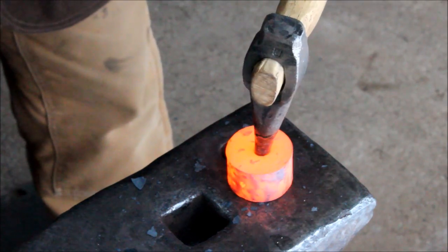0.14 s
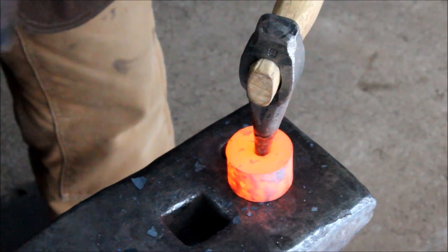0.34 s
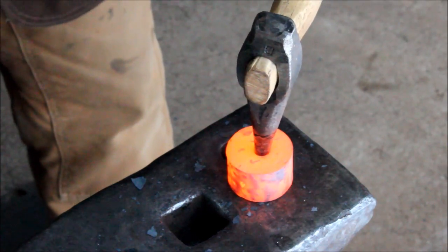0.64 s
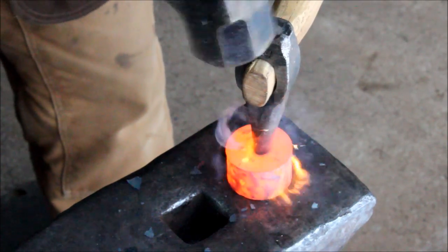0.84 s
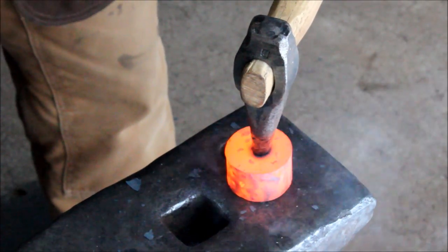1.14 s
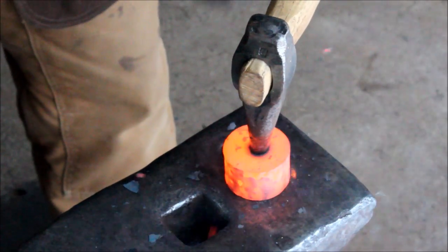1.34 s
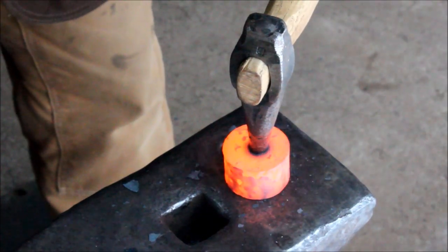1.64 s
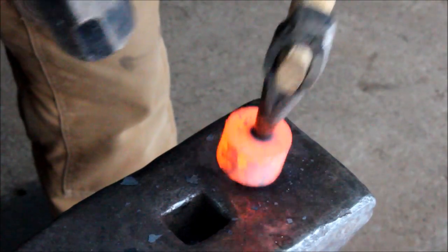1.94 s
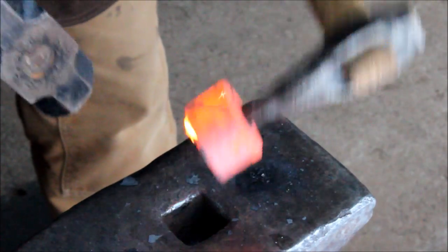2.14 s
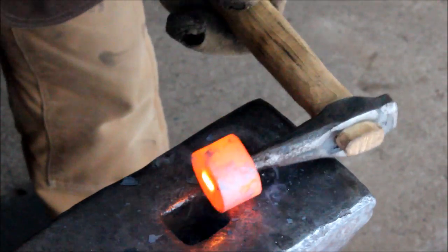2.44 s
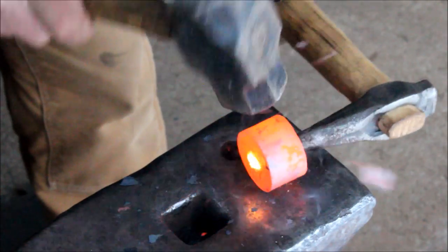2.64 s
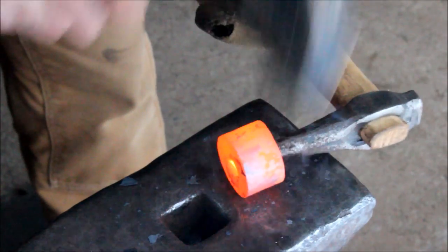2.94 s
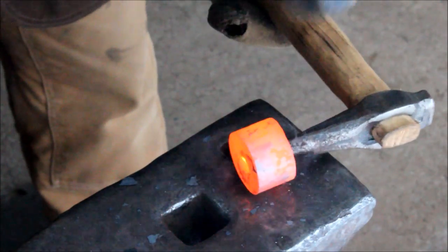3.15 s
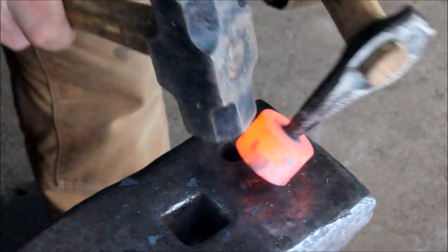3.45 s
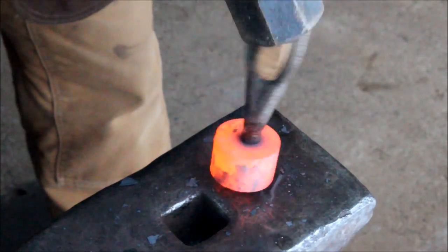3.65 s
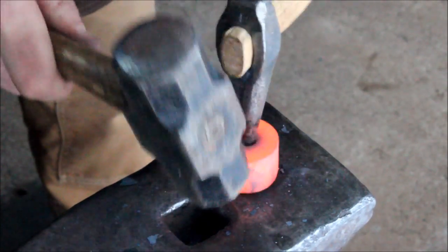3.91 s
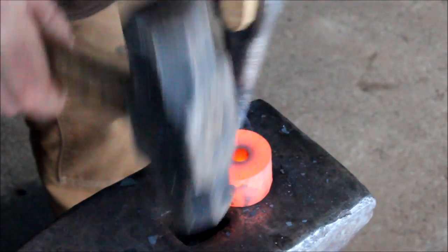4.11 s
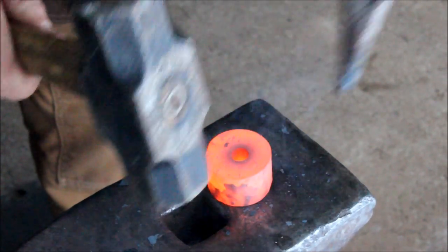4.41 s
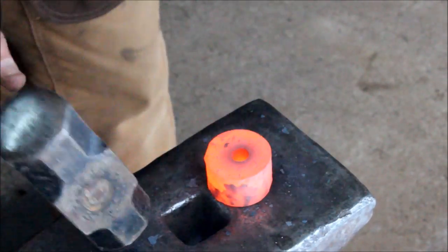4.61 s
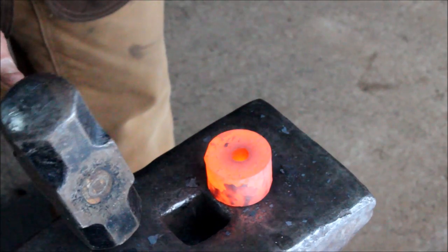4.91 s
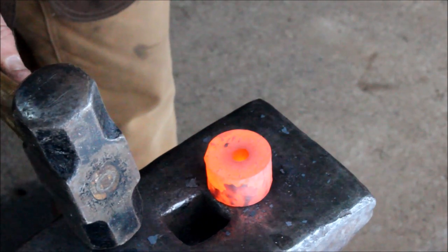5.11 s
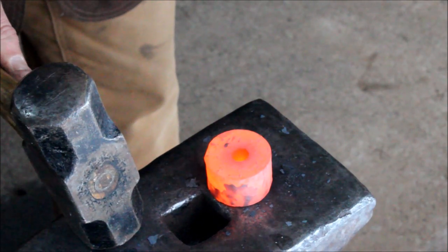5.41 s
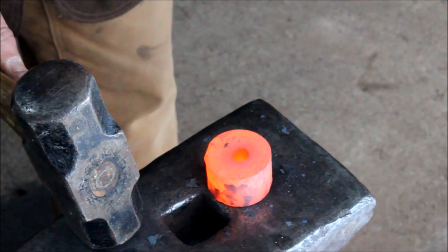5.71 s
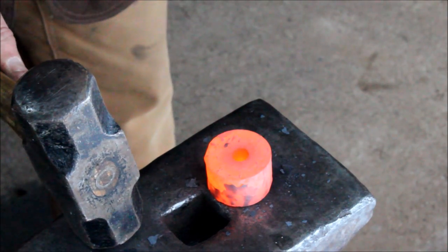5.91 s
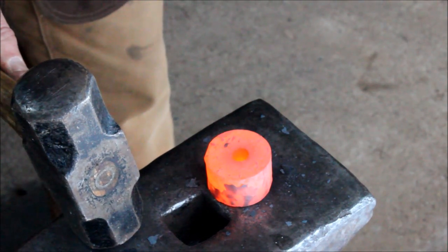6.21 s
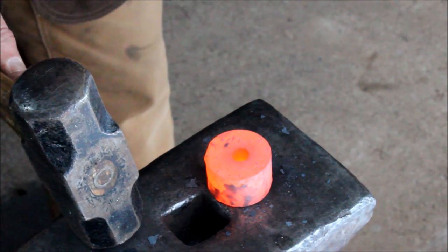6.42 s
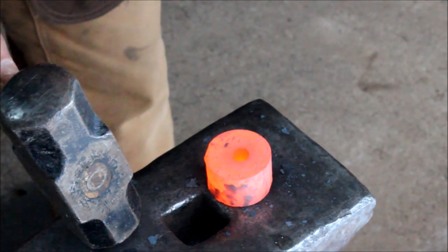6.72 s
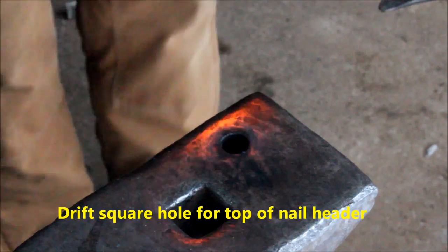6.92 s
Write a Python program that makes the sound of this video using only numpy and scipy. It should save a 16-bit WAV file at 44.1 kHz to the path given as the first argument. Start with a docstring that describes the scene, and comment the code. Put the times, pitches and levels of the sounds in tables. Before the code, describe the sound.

Eight sledge blows ring on a punch through hot steel, then the sledge bounces down and water briefly gurgles, hisses and clunks in a small workshop.

```python
"""Punching hot steel on an anvil

A smith drives a handled punch through hot steel: eight blows, each noise bursts plus decaying modes of the tools.
The sledge is let down on the anvil and bounces; the hot punch then gurgles and sizzles in water, as coloured grains
and whistling noise bands, and is dropped with a clunk, a damped burst. Tools scrape at the end, as rough grains.
Filtered noise gives the small workshop's reverberation and low rush; the close microphone overloads and clips."""
import sys
import numpy as np
from scipy import signal
from scipy.fft import rfft, irfft, next_fast_len
from scipy.io import wavfile
from scipy.ndimage import uniform_filter1d

SR = 44100
rng = np.random.default_rng(int(sys.argv[2]) if len(sys.argv) > 2 else 0)


def dump(signal):
    """Clip the signal to [-1, 1] and save it as 16-bit WAV at the path in sys.argv[1]."""
    limited = np.clip(np.atleast_2d(signal).T, -1, 1)
    pcm = np.round(limited * 32767).astype(np.int16)
    wavfile.write(sys.argv[1], SR, pcm)


N = 311343
T = np.arange(N) / SR
AGE = T[:SR]  # time since a contact [s]
# Levels in all tables are relative; spectra are shapes, and fades are exponential time constants.

# the sledge settles back on the punch: start and end (after the blow), loss
SETTLE_FROM_S, SETTLE_UNTIL_S, SETTLE_DB = .025, .04, -11
# share of the old ring that outlasts a new blow, and the time the choke takes
CHOKE_SHARE, CHOKE_S = .3, .01
# the stand's thud under a full blow
THUD_DB = -31
# weaker blows lose the top of their tick and of the anvil's ring, in dB per dB
SOFT_BLOW_DB, SOFT_DULLING = -5, 4.0
# dB that the sledge's high modes change per dB of a blow's treble
SLEDGE_DULLING = .7
# spectrum of a blow's crack: (frequency [Hz], density [dB per Hz])
CRACK_SPECTRUM = [(40, -23.5), (100, -8), (230, -0.5), (450, 2.5), (800, 0), (1060, 0.5), (2000, -1.5),
                  (2800, 2), (4000, -0.5), (5200, 1.5), (6700, -2), (7500, -7.5), (11000, -15.5),
                  (16000, -26)]
# sledge blows: (time [s], crack [dB], bass [dB], body [dB], treble [dB], fade [s], punch ring [dB],
# lowest punch modes [dB], sledge ring [dB], anvil ring [dB], nearness to the anvil's edge [0-1])
SLEDGE_BLOWS = [(0.8453, 10.5, -1, -2.5, 0, .0036, -16, 3, -18.5, -17, .7),
                (1.2874, 5.5, -2.5, -2, 1, .0027, -2.5, -1.5, -24.5, -23, .05),
                (1.7553, 5.5, -6.5, -4, .5, .0032, -5.5, -8, -20.5, -32, .1),
                (2.2764, -10, -7, -1.5, -3, .0034, -6.5, -7.5, -35.5, -47, .15),
                (2.655, .5, 1.5, 1.5, -2.5, .0024, -7.5, 5, -33, -45, .35),
                (3.032, -1.5, 2.5, 1.5, -4, .0026, -9.5, .5, -24, -43, .65),
                (3.3665, -4.5, -1, 0, -8.5, .0035, -13.5, -1, -30.5, -49, .7),
                (4.212, -2.5, 1, 9, -17, .0025, -10, 2.5, -22.5, -40.5, .78)]


def blows():
    """Impact excitation: each blow ticks, cracks and rings punch, sledge, anvil and stand; gives cracks and rings."""
    cracks, rings = np.zeros(N), np.zeros(N)
    # the punch rings freely for a moment, then the sledge settles back on it
    settle = undb(np.interp(AGE, [SETTLE_FROM_S, SETTLE_UNTIL_S], [0, SETTLE_DB]))
    for (s, crack_db, bass_db, body_db, treble_db, fade_s, punch_db,
         lowest_db, sledge_db, anvil_db, edge) in SLEDGE_BLOWS:
        # the pressure of a new blow chokes what still rings
        rings *= np.interp(T, [s, s + CHOKE_S], [1, CHOKE_SHARE])
        add(cracks, s, undb(crack_db) * burst(CRACK_SPECTRUM, bass_db, treble_db, fade_s, body_db))
        top_db = SOFT_DULLING * min(crack_db - SOFT_BLOW_DB, 0)
        add(cracks, s, first_tick(crack_db, treble_db, top_db))

        thud_db = THUD_DB + min(crack_db + bass_db, 0)
        add(rings, s, undb(thud_db) * stand(scatter_db=0))
        punch_ring = settle * flutter(rate=100, depth_db=4) * punch(lowest_db)
        add(rings, s, undb(punch_db) * punch_ring)
        # a soft blow spares the sledge's high modes
        high_db = SLEDGE_DULLING * treble_db
        sledge_ring = sledge(lambda hz: high_db * (hz > 6000), scatter_db=1)
        add(rings, s, undb(sledge_db) * flutter(rate=46, depth_db=2.0) * sledge_ring)
        add(rings, s, undb(anvil_db) * flutter(rate=14, depth_db=2.5) * anvil(edge, top_db))
    return cracks, rings


# level for a 0 dB blow [dB], dB per dB of crack and of treble, fade
TICK_DB, TICK_PER_CRACK, TICK_PER_TREBLE, TICK_FADE_S = 2.5, 1.3, .7, .00038
# spectrum of the first tick of steel on steel: (frequency [Hz], density [dB per Hz])
TICK_SPECTRUM = [(300, -14.5), (1500, -4), (4000, -1), (8000, 2), (12000, -6), (16000, -5)]


def first_tick(crack_db, treble_db, top_db):
    """Contact stiffness: the harder and brighter the blow, the stronger its first tick."""
    level_db = TICK_DB + TICK_PER_CRACK * crack_db + TICK_PER_TREBLE * treble_db
    return undb(level_db) * burst(TICK_SPECTRUM, 0, top_db, TICK_FADE_S)


# modes of the punch: (frequency [Hz], level [dB], t60 [s])
PUNCH_MODES = [(1809, -9.5, .3), (1831, -21, .2), (2401, -7.5, .22), (2458, -1, .36), (2475, -11, .42),
               (6110, -18, .26), (6713, -25, .3), (6870, -26, .25), (9889, -30, .16), (11530, -38, .4),
               (11990, -37, .3)]


def punch(lowest_db):
    """Bending vibration: an off-centre blow feeds the punch's lowest modes more."""
    modes = [(hz, db + lowest_db * (hz < 2000), t60) for hz, db, t60 in PUNCH_MODES]
    return ring(modes, scatter_db=0)


# modes of the sledge: (frequency [Hz], level [dB], t60 [s])
SLEDGE_MODES = [(2485, -5, .3), (3904, 1.5, .25), (3916, -11, .3), (4657, -7, .24), (5110, -12, .3),
                (5561, -11, .32), (6102, -1.5, .3), (7770, -18, .2), (7880, -20, .35), (8245, -8.5, .34)]


def sledge(tilt_db, scatter_db):
    """Modal excitation: the contact tilts the balance of the sledge's modes."""
    return ring([(hz, db + tilt_db(hz), t60) for hz, db, t60 in SLEDGE_MODES], scatter_db)


# modes of the anvil: (frequency [Hz], level struck mid-face [dB], level struck at the edge [dB], t60 [s])
ANVIL_MODES = [(3597, -11, 4.5, .48), (4569, 0, -4, .78), (5880, -20, -11, .6), (10340, -26, -30, .45),
               (11150, -16, -19, .8), (11161, -23, -25, .8)]


def anvil(edge, top_db):
    """Mode shapes: the struck spot decides which modes take the energy; a soft contact spares the top ones."""
    share = np.clip(edge, 0, 1)
    modes = []
    for hz, mid_db, rim_db, t60 in ANVIL_MODES:
        db = mid_db + share * (rim_db - mid_db) + top_db * (hz > 9000)
        modes.append((hz, db, t60))
    return ring(modes, scatter_db=1.5)


# modes of the anvil's stand and the floor under it: (frequency [Hz], level [dB], t60 [s])
STAND_MODES = [(48, -21, .9), (97, -28, .55), (110, -8, .16), (228, 0, .2), (270, -3, .13), (310, -6, .12),
               (450, -4, .1)]


def stand(scatter_db):
    """Low-frequency resonance: stand and floor thud under a contact."""
    return ring(STAND_MODES, scatter_db)


# thin high notes and a short clink, started by blows and taps: (time [s], frequency [Hz], level [dB], t60 [s])
THIN_NOTES = [(.8454, 6500, -45.5, 1.3), (1.7553, 6490, -49, 2.2), (1.7553, 8740, -57, 2.4),
              (3.885, 6500, -57.5, 1), (4.15, 1330, -31, .17), (4.15, 2200, -34, .15)]


def thin_notes():
    """Modal decay: single thin modes ring on after a contact."""
    out = np.zeros(N)
    for s, hz, db, t60 in THIN_NOTES:
        add(out, s, flutter(rate=20, depth_db=1.5) * ring([(hz, db, t60)], scatter_db=1))
    return out


# spectrum of a light contact: (frequency [Hz], density [dB per Hz])
TAP_SPECTRUM = [(60, -17), (230, -3.5), (600, 2), (900, 0), (1280, 4.5), (1900, -1), (3400, -4.5),
                (4700, -14), (6000, -19), (7500, -30.5), (11000, -46), (16000, -54)]
# light contacts of tools on the work and the anvil: (time [s], level [dB], bass [dB], treble [dB], fade [s],
# thud [dB], sledge ring [dB], anvil ring [dB])
LIGHT_CONTACTS = [(3.853, -35, 3, 8, .006, -45, -63, -72), (3.885, -14.5, -.5, 12, .0025, -23, -50, -63),
                  (4.1185, -42, 13.5, 10, 0.0044, -54, -75, -81),
                  (4.149, -16.5, -14, 18, .004, -59, -47, -68),
                  (4.663, -9.5, -6, -6, 0.0029, -34, -34, -40),
                  (4.7815, -11, -5, -20, 0.0042, -34, -34, -48),
                  (4.8354, -12, -4, -11, .0022, -35, -40, -40.5),
                  (4.8684, -14, -7, -17, 0.0023, -35, -40, -53)]


def taps():
    """Slow contact: the punch is set on the work, later the sledge bounces to rest; low modes are favoured."""
    cracks, rings = np.zeros(N), np.zeros(N)
    for s, db, bass_db, treble_db, fade_s, thud_db, sledge_db, anvil_db in LIGHT_CONTACTS:
        add(cracks, s, undb(db) * burst(TAP_SPECTRUM, bass_db, treble_db, fade_s))
        add(rings, s, undb(thud_db) * stand(scatter_db=1.5))
        sledge_ring = sledge(lambda hz: at(hz, [(2500, 9.5), (3900, -2.5), (9000, -12)]), scatter_db=0.5)
        add(rings, s, undb(sledge_db) * sledge_ring)
        # the anvil is struck at its edge
        add(rings, s, undb(anvil_db) * anvil(edge=1, top_db=-5))
    return cracks, rings


# ticks of flaking scale and spitting water: (time [s], level [dB])
SCALE_TICKS = [(.088, -35), (.188, -30.5), (.435, -37), (0.926, -33), (5.75, -23), (6.152, -38),
               (6.861, -48), (7.028, -44)]


def ticks():
    """Impulsive radiation: tiny bright snaps."""
    spectrum = [(500, -19), (3000, 2.5), (10000, -3.5), (16000, -4)]  # (Hz, dB per Hz)
    out = np.zeros(N)
    for s, db in SCALE_TICKS:
        add(out, s, undb(db) * burst(spectrum, 0, 0, fade_s=0.00067))
    return out


SURGE_RISE_S = .02
# the steam pocket forms, grows (time constant) and sinks in pitch towards a settled note
POCKET_FORMS_S, POCKET_FIRST_HZ, POCKET_SETTLED_HZ, POCKET_GROW_S = 5.125, 1900, 1220, .07
# spectra of boiling and of sizzling: (frequency [Hz], density [dB per Hz])
GURGLE_SPECTRUM = [(47, -56), (80, -23), (166, -12), (316, -23), (404, -5), (820, -1), (1340, -3),
                   (1900, -6.5), (3100, -9.5), (3790, -10.5), (8600, -21.5), (14000, -72), (16000, -73)]
SIZZLE_SPECTRUM = [(120, -42), (200, -9.5), (387, -10), (440, -4), (569, -14), (1210, -5), (1480, -4.5),
                   (2860, -3.5), (3190, -4), (9060, -7), (12800, -16.5), (14900, -28), (16000, -44)]
# surges of the quench: (time [s], hold [s], fade [s], boiling [dB], steam pocket [dB], sizzle [dB])
QUENCH_SURGES = [(5.14, .02, .1, -62, -41, -44), (5.255, .02, .2, -33.5, -39.5, -55),
                 (5.44, .08, .05, -47, -44, -56), (5.575, .005, .11, -48, -39, -31),
                 (5.7, .06, .17, -60, -66, -38.5), (6.14, .17, .03, -66, -66, -44)]
# narrow jets of steam: (start [s], end [s], start frequency [Hz], end frequency [Hz], level [dB])
STEAM_JETS = [(5.105, 5.42, 7400, 7450, -54.5), (5.308, 5.578, 3150, 3050, -46.5),
              (5.533, 5.636, 4700, 4400, -37.5), (5.534, 5.616, 5900, 5800, -42),
              (5.601, 5.838, 2600, 3150, -44)]


def quench():
    """Boiling and cavity resonance: hot steel gurgles and sizzles, a growing steam pocket sinks, jets whistle."""
    boil_gain = pocket_gain = sizzle_gain = 0
    for s, hold_s, fade_s, boil_db, pocket_db, sizzle_db in QUENCH_SURGES:
        surge = swell(s, SURGE_RISE_S, hold_s, fade_s)
        boil_gain = boil_gain + undb(boil_db) * surge
        pocket_gain = pocket_gain + undb(pocket_db) * surge
        sizzle_gain = sizzle_gain + undb(sizzle_db) * surge

    bubbles = unit(colour(grains(rate=2700, spread_db=0.5), GURGLE_SPECTRUM))
    boil = bubbles * undb(0.97 * walk(45)) * boil_gain

    young = np.exp(-np.maximum(T - POCKET_FORMS_S, 0) / POCKET_GROW_S)
    pocket_hz = POCKET_SETTLED_HZ + young * (POCKET_FIRST_HZ - POCKET_SETTLED_HZ)
    steam = whistle(pocket_hz) * pocket_gain
    for start, end, start_hz, end_hz, db in STEAM_JETS:
        progress = np.clip((T - start) / (end - start), 0, 1)
        jet_hz = start_hz + progress * (end_hz - start_hz)
        steam += undb(db) * np.sin(np.pi * progress) * whistle(jet_hz)

    spatter = unit(colour(grains(rate=9000, spread_db=0.5), SIZZLE_SPECTRUM))
    sizzle = spatter * undb(0.73 * walk(60)) * sizzle_gain
    return boil + steam + sizzle


# spectrum of knocks and splashes: (frequency [Hz], density [dB per Hz])
CLUNK_SPECTRUM = [(35, -72), (60, -56), (153, -3), (198, -16.5), (448, 7), (527, 3.5), (666, 4), (803, 3),
                  (1410, -1), (8510, -15.5), (12100, -26.5), (14900, -58), (16000, -74)]
# dull knocks and splashes further off: (time [s], level [dB], bass [dB], treble [dB], fade [s])
FAR_CLUNKS = [(5.252, -27, 1.5, -4, 0.045), (5.345, -23.5, -3.5, 1.5, 0.016), (5.976, -26.5, -1.5, 5, .012),
              (6.005, -23, -10, 6, 0.045), (6.024, -3, -7, 0, .013), (6.229, -21.5, -6.5, -1, 0.0042),
              (6.8988, -31, 8, 8, 0.0096), (6.9862, -34.5, 7, 1, 0.0056)]


def clunks():
    """Damped impact: slops of water and knocks of tools put down fade without ringing."""
    out = np.zeros(N)
    for s, db, bass_db, treble_db, fade_s in FAR_CLUNKS:
        add(out, s, undb(db) * burst(CLUNK_SPECTRUM, bass_db, treble_db, fade_s))
    return out


TWIST_RISE_S, TWIST_FADE_S = .11, .03
DRAG_RISE_S, DRAG_FADE_S = .004, .012
# spectra of the twisting punch and of the dragged tool: (frequency [Hz], density [dB per Hz])
TWIST_SPECTRUM = [(400, -24), (1500, -5.5), (1900, 3), (2200, -5.5), (2500, 2), (3000, -4), (6000, -8),
                  (10000, -11), (16000, -28.5)]
DRAG_SPECTRUM = [(47, -44), (80, -13), (222, -4.5), (395, -9.5), (441, -8), (802, -15), (1670, -10.5),
                 (3540, -10.5), (9190, -21.5), (13700, -35), (16000, -54)]
# twists of the punch in the hot work: (time of full pressure [s], hold [s], level [dB])
PUNCH_TWISTS = [(.02, .3, -57), (.6, .23, -51.5), (2.2, .07, -52.5), (2.59, .06, -58), (3.0, .03, -60),
                (4.52, .13, -63)]
# pushes of a tool dragged over grit: (time of full pressure [s], hold [s], level [dB])
GRIT_DRAGS = [(6.858, .03, -43), (6.902, .16, -37), (6.952, .015, -33), (7.027, .012, -38)]


def scrape():
    """Stick-slip friction: steel catches and slips as the punch twists in its hole, later as a tool drags on grit."""
    twist_gain = sum(undb(db) * swell(s, TWIST_RISE_S, hold_s, TWIST_FADE_S) for s, hold_s, db in PUNCH_TWISTS)
    drag_gain = sum(undb(db) * swell(s, DRAG_RISE_S, hold_s, DRAG_FADE_S) for s, hold_s, db in GRIT_DRAGS)
    twist = unit(colour(grains(rate=6000, spread_db=3.0), TWIST_SPECTRUM))
    drag = unit(colour(grains(rate=5700, spread_db=0.5), DRAG_SPECTRUM))
    return twist * undb(1.7 * walk(30)) * twist_gain + drag * undb(1.5 * walk(70)) * drag_gain


# quick reflections and tail, before the room's colour
EARLY_DB, LATE_DB = -6.5, -16.7
# the workshop's decay: (frequency [Hz], t60 [s])
ROOM_DECAY = [(100, 0.62), (300, 0.51), (1000, 0.6047), (3000, .5), (6000, 0.506), (14000, 0.31)]
# the workshop's tone: (frequency [Hz], gain [dB])
ROOM_TONE = [(40, -5.5), (110, 0.5), (230, 4), (600, -1.5), (2500, -3), (6000, -4.5), (10000, -9),
             (12500, -11), (16000, -20)]


def room(x, early_db, late_db):
    """Reverberation: quick reflections from anvil, floor and smith, then a tail that dulls as it fades."""
    hz, s, bins = signal.stft(rng.standard_normal(len(AGE)), SR, nperseg=256)
    fading = bins * np.exp(-np.log(1000) * s / at(hz, ROOM_DECAY)[:, None])
    late = signal.istft(fading, SR)[1][:len(AGE)] * np.clip(AGE / 0.017, 0, 1)
    early = rng.standard_normal(len(AGE)) * np.exp(-AGE / .02) * np.clip(AGE / 0.0054, 0, 1)
    early = even(early, 30)
    response = undb(early_db) * unit(early) + undb(late_db) * unit(late)
    # the end of the response is faded to silence
    fade_out = np.clip((AGE[-1] - AGE) * 10 - 2, 0, 1)
    response = colour(response, ROOM_TONE) * fade_out / np.sqrt(len(AGE))
    return signal.fftconvolve(x, response)[:N]


# overall level before any sinking, depth sunk by the last blow, time it stays down after it, time to return
RUSH_DB, SINK_DB, SINK_HOLD_S, RETURN_S = -48.5, 19.5, .35, 1.0
# spectrum of the rush: (frequency [Hz], density [dB per Hz])
RUSH_SPECTRUM = [(15, -44), (25, -4.5), (114, -3), (217, -4), (285, -1), (317, -5), (1100, -8),
                 (1560, -11.5), (1890, -5), (2350, -11.5), (2550, -11), (3720, -14.5), (9320, -21),
                 (14000, -38), (16000, -44)]


def rush():
    """Broadband noise: a low rush with fluttering bass steps down at every blow and returns after the last."""
    low = colour(rng.standard_normal(N), [(500, 3), (1500, -17.5), (5000, -65)]) * undb(2.2 * walk(9.2))
    high = colour(rng.standard_normal(N), [(200, -17.5), (800, -1)]) * undb(0.94 * walk(21))
    times = [blow[0] for blow in SLEDGE_BLOWS]
    # the first blows push it down most
    sunk = np.sqrt(np.searchsorted(times, T) / len(times))
    returned = np.clip((T - times[-1] - SINK_HOLD_S) / RETURN_S, 0, 1)
    return unit(colour(low + high, RUSH_SPECTRUM)) * undb(RUSH_DB - SINK_DB * sunk * (1 - returned))


def burst(spectrum, bass_db, treble_db, fade_s, body_db=0):
    """Heavy damping: the crowded vibrations of a contact merge into a short coloured noise."""
    hz = np.fft.rfftfreq(len(AGE), 1 / SR)
    shape = unit(undb(at(hz, spectrum)))
    shape = shape * undb(at(hz, [(700, bass_db), (2600, 0), (4500, 0), (9000, treble_db)]))
    shape = shape * undb(at(hz, [(850, 0), (1500, body_db), (3200, 0)]))
    noise = even(rng.standard_normal(len(AGE)) * np.exp(-AGE / fade_s), 200)
    # the shift keeps what filtering smears ahead of the contact
    sound = np.roll(irfft(rfft(noise) * shape, len(AGE)), 20)
    # the contact builds over a fraction of a millisecond
    return sound * np.clip(AGE / .0004, 0, 1) * (AGE < .5)


def ring(modes, scatter_db):
    """Modal superposition: decaying sines whose shares may scatter from contact to contact."""
    out = 0
    for hz, db, t60 in modes:
        size = undb(db + scatter_db * rng.standard_normal()) * rng.choice([-1, 1])
        out = out + size * np.exp(-np.log(1000) * AGE / t60) * np.sin(2 * np.pi * hz * AGE)
    return out


def flutter(rate, depth_db):
    """Amplitude modulation: a bounded random wander makes a ring's loudness flutter."""
    return undb(depth_db * np.tanh(walk(rate)[:len(AGE)]) * np.clip(AGE / 0.028, 0, 1))


def whistle(hz):
    """Amplitude modulation: low noise times a gliding sine makes a noise band that follows a pitch curve."""
    wander = unit(colour(rng.standard_normal(N), [(90, -0.5), (200, -7), (600, -24), (2000, -70)]))
    return unit(wander * np.sin(2 * np.pi * np.cumsum(hz) / SR))


def grains(rate, spread_db):
    """Shot noise: dense random clicks of unequal size, rate a second."""
    chance, size, sign = rng.random(N), rng.exponential(size=N), rng.standard_normal(N)
    return unit((chance < rate / SR) * undb(spread_db * np.minimum(size, 4)) * sign)


def walk(rate):
    """Low-pass randomness: a smooth wander with a spread near 1."""
    step = max(int(SR / rate), 1)
    held = np.repeat(rng.standard_normal(N // step + 1), step)
    return np.sqrt(2) * uniform_filter1d(held, 2 * step)[:N]


def swell(s, rise_s, hold_s, fade_s):
    """Exponential envelope: rises to 1 at time s, holds and fades."""
    return np.exp(np.clip(np.minimum((T - s) / rise_s, (s + hold_s - T) / fade_s), -30, 0))


def colour(x, points):
    """Linear filtering: scale the spectrum of x by (Hz, dB) points."""
    size = next_fast_len(len(x))
    gain = undb(at(np.fft.rfftfreq(size, 1 / SR), points))
    return irfft(rfft(x, size) * gain, size)[:len(x)]


def even(x, width_hz):
    """Spectral whitening: flatten the broad chance bumps of a noise burst at about the same energy."""
    bins = rfft(x)
    power = uniform_filter1d(np.abs(bins) ** 2, int(width_hz * len(x) / SR))
    return irfft(bins * np.sqrt(np.mean(power) / power), len(x))


def at(hz, points):
    """Logarithmic pitch: read (Hz, value) points on a log-frequency axis."""
    f, value = np.transpose(points)
    return np.interp(np.log(np.maximum(hz, 1)), np.log(f), value)


def undb(db):
    """Level law: decibels to amplitude gain."""
    return 10 ** (np.asarray(db) / 20)


def unit(x):
    """Normalisation: scale to rms 1."""
    return x / np.sqrt(np.mean(x ** 2))


def add(track, s, sound):
    """Superposition: mix a sound into the track at time s."""
    i = int(s * SR)
    track[i:i + len(sound)] += sound[:N - i]


def scene():
    """Superposition: near cracks and rings and the further sounds share one room, over the rush."""
    blow_cracks, blow_rings = blows()
    tap_cracks, tap_rings = taps()
    rings = blow_rings + thin_notes() + tap_rings
    near = blow_cracks + ticks()
    far = clunks()
    handling = undb(-0.5) * (quench() + scrape())
    # each group excites the room by its own amount
    send = near + undb(6) * tap_cracks + undb(6) * far + undb(3.5) * handling + undb(-11) * rings
    direct = near + tap_cracks + rings + far + handling
    return (direct + room(send, EARLY_DB, LATE_DB) + rush())[None]


TOP_HZ = 16800


def record(dry):
    """Overload: the microphone thins the deep bass, the hardest blows clip flat, and the top is cut."""
    thinned = signal.sosfilt(signal.butter(1, 70, "high", fs=SR, output="sos"), dry)
    clipped = np.clip(thinned, -1, 1)
    return signal.sosfilt(signal.ellip(8, .2, 60, TOP_HZ, fs=SR, output="sos"), clipped)


dry = scene()
out = record(dry)
dump(out)
```